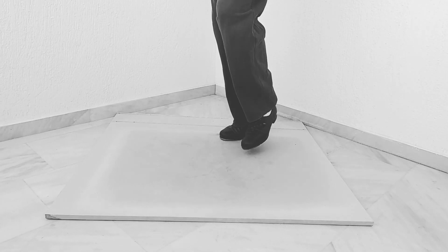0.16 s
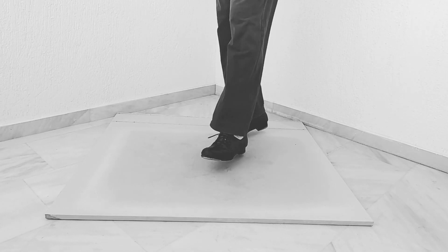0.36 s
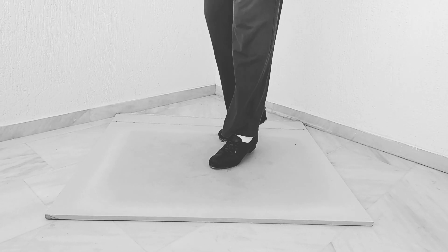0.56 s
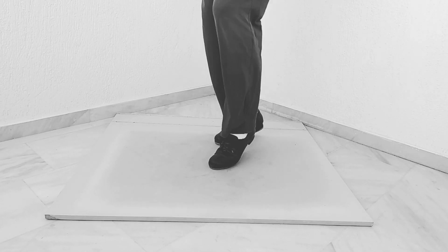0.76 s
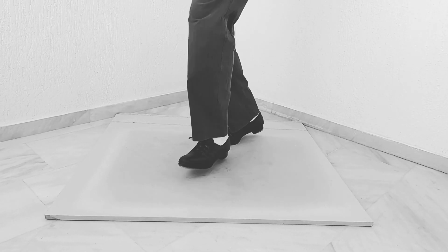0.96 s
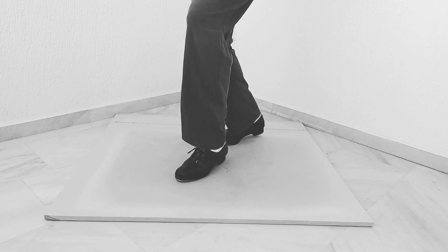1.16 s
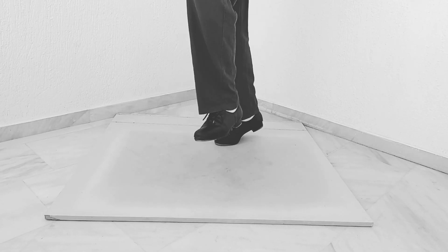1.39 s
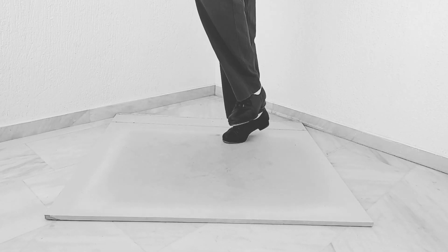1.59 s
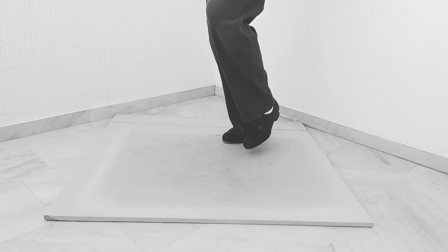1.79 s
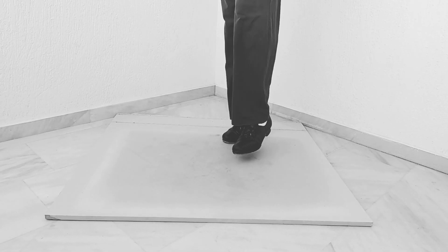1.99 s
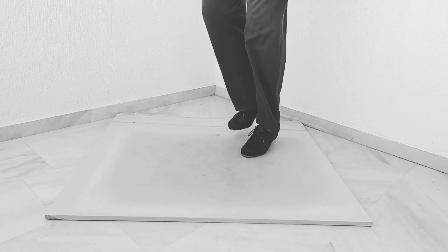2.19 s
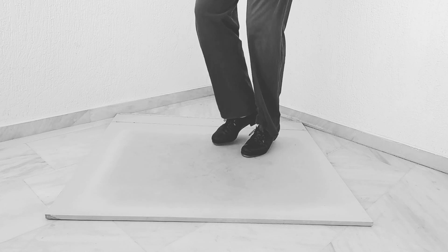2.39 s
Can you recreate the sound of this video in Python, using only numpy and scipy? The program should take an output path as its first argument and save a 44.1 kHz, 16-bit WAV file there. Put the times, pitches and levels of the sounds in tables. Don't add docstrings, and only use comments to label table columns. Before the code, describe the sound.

Tap shoes on a hard board: a few evenly spaced crisp clacks, a heavy double stomp, then three firm taps, close stereo microphone in a bare, echoing tiled room with faint hush.

```python
import sys
import numpy as np
from scipy import signal
from scipy.io import wavfile
from scipy.ndimage import uniform_filter1d, minimum_filter1d

SR = 44100
rng = np.random.default_rng(int(sys.argv[2]) if len(sys.argv) > 2 else 0)


def pcm_store(signal):
    levels = np.round(np.clip(np.atleast_2d(signal), -1, 1) * 32767)
    wavfile.write(sys.argv[1], SR, levels.astype(np.int16).T)


def how_loud(loudness_db):
    steps = np.asarray(loudness_db, float) / 20
    return 10 ** steps


N = 108045

# (pitch [Hz], level [dB per Hz])
HUSH_COLOUR = [(15, -3), (25, 3.5), (231, -10.5), (351, -15), (1520, -3.5), (2630, -17), (2850, -33.5),
               (7500, -24.5), (13000, -46)]
# (pitch [Hz], time to fall by 60 dB [s])
RING_TIMES = [(60, 0.52), (200, 0.7), (500, 0.64), (1200, 0.46), (3000, 0.47), (7000, 0.31), (11000, 0.4)]
# (pitch [Hz], likeness [0-1])
LIKENESS = [(60, 1), (300, 0.77), (700, 0.51), (1500, 0.067), (4000, 0.033), (12000, 0.1)]
# (delay [s], left level [dB], right level [dB])
WALL_ECHOES = [
    (.0036, 3, 4),
    (.0048, -4, -3),
    (.0075, -1, -1),
    (.0105, -2, -3),
    (.0145, 1, 1),
    (.018, 2, 1),
    (.021, 1, 1),
]
SLAB_BOOMS = [-66, -76, -42, -42, -45, -30, -29.5, -80, -78, -46, -44, -68, -80]
# (time [s], thud pitch [Hz], thud level [dB], crack pitch [Hz], crack level [dB])
STRIKES = [(-0.035, 254, -33, 2480, -27.5), (0.2367, 432, -36, 2800, -24), (0.4785, 318, -22, 3180, -31.5),
           (0.7392, 195, -23, 2417, -33), (0.7434, 180, -47, 2310, -25), (1.0308, 312, -11.5, 2480, -36),
           (1.0463, 223.5, -10, 3020, -31), (1.2667, 303, -96.5, 3560, -47),
           (1.4849, 300, -41.5, 3740, -58.5), (1.594, 700, -16, 2570, -26.5),
           (1.8799, 432, -43, 2920, -22.5), (2.1211, 203, -30, 2592, -24.5), (0.754, 300, -33, 2400, -68)]
# (low pitch [Hz], low level [dB], high pitch [Hz], high level [dB])
BOARD_KNOCKS = [(583, -17, 1310, -18), (918, -19.5, 1350, -13), (915, -24, 1270, -18.5),
                (997, -16.5, 1500, -28.5), (764, -19, 1420, -16), (964, -5.5, 1500, -9.5),
                (662, -14.5, 1050, -7.5), (800, -74, 1000, -73), (810, -41, 1600, -57),
                (528, -10, 1390, -13.5), (954, -19, 1290, -12), (700, -23, 1520, -14),
                (778, -25.5, 1400, -34.5)]
# (low pitch [Hz], low level [dB], high pitch [Hz], high level [dB])
PLATE_PINGS = [(4810, -27.5, 7060, -30.5), (5500, -22, 6910, -14.5), (5630, -21, 6970, -16),
               (5230, -21.5, 7160, -21), (5120, -24, 6400, -24), (5830, -20.5, 7600, -14.5),
               (6200, -16, 6560, -21), (7000, -52, 8150, -41.5), (5700, -47, 7300, -46.5),
               (4520, -27, 7620, -22.5), (5620, -19.5, 7260, -14.5), (5330, -19, 7080, -15.5),
               (5000, -37, 3100, -56)]
# (low pitch [Hz], low depth [0-1], high pitch [Hz], high depth [0-1])
CANCEL_DIPS = [(1960, 0.06, 5200, 0), (2190, 0.55, 4050, 0.28), (2010, .97, 4630, 1),
               (2130, 0.36, 4980, 0.9), (1970, 0.44, 4200, .7), (1960, 0.15, 3800, 0),
               (2000, 0, 4630, 0.93), (2000, 0.07, 3800, 0.64), (2000, .1, 4000, 0.25),
               (1060, 0.1, 8100, 0.45), (2100, .6, 4050, 0.5), (2070, 0.17, 3760, 0.4), (2100, 0, 4000, .1)]
MODE_WIDTHS = (0.32, 0.18, 0.68, 0.7, 0.15, 0.36)
MODE_SIGNS = (1, 1, 1, -1, 1, 1)
# (pitch [Hz], gain [dB])
MIC_COLOUR = [(40, 12), (300, 6), (2000, 8.5), (4000, 10), (8400, 5.5), (9000, 0.5), (11000, 4.5),
              (13000, -3.5)]
# (pitch [Hz], left minus right [dB])
SIDE_TILT = [(60, 4.0), (150, 7), (360, 2.5), (890, 3.5), (2190, 0.5), (5380, -2.0), (13200, -3)]

HUSH_DB = -62.5
RIGHT_LAG_S, RATTLE_S = 0.00013, 0.0027
FIRST_TOUCH, CONTACT_GAIN = 0.3, 1.3
ECHO_DULL_S, ECHO_TOP_HZ, SCATTER_S = 0.0079, 9700, 0.0005
ROOM_DB, ROOM_RISE_S = 5.5, 0.007
LATE_DB, LATE_STRETCH = -17, 1.7
BOOM_HZ, BOOM_T60_S, BOOM_LAG_S = 60.5, 0.099, 0.026
BLOW_LOW_HZ = 139
DIP_SHARPNESS = 5
LEAD = SR // 4
EDGE_HZ = 13700
PATCHY_HZ, PATCH_BINS, PATCH_FRAMES, PATCH_KEPT = 8800, 8, 6, 0.45
LIMIT_DB, RATIO, RECOVER_DB_PER_S, CEILING = -19.5, 3.2, 27.5, 0.97


def evened(x):
    return x / np.sqrt(np.mean(x ** 2) + 1e-20)


def read(points, hz):
    f, value = np.transpose(points)
    return np.interp(np.log(hz + 1), np.log(f + 1), value)


def causal(points, size=4096):
    log_gain = np.log(how_loud(read(points, abs(np.fft.fftfreq(size, 1 / SR)))))
    spectrum = np.exp(np.conj(signal.hilbert(log_gain)))
    return np.fft.ifft(spectrum).real[:size // 2]


def pair(shape, hz):
    a, b, c, d = rng.standard_normal((4,) + shape)
    same = np.clip(read(LIKENESS, hz), 0, 1)[:, None]
    left, other = a + 1j * b, c + 1j * d
    return np.array([left, same * left + np.sqrt(1 - same ** 2) * other])


def hush():
    frames, hz = N // 256 + 5, np.fft.rfftfreq(1024, 1 / SR)
    patches = uniform_filter1d(rng.standard_normal((513, frames)), 8, axis=0)
    patches = evened(uniform_filter1d(patches, 12, axis=1))
    level_db = read(HUSH_COLOUR, hz)[:, None] + 2.9 * patches
    z = pair(patches.shape, hz) * how_loud(level_db)
    noise = signal.istft(z, nperseg=1024, noverlap=768)[1][:, :N]
    return how_loud(HUSH_DB) * evened(noise)


def room_tail():
    hz, t = np.fft.rfftfreq(256, 1 / SR), np.arange(SR // 64 + 1) * 64 / SR
    t60 = read(RING_TIMES, hz)[:, None]
    early_power = how_loud(-120 * t / t60)
    late_power = how_loud(2 * LATE_DB - 120 * t / (t60 * LATE_STRETCH))
    fall = np.sqrt(early_power + late_power)
    tail = signal.istft(pair(fall.shape, hz) * fall, nperseg=256, noverlap=192)[1]
    tail *= 1 - np.exp(-(np.arange(tail.shape[1]) / SR / ROOM_RISE_S) ** 2)
    return tail * how_loud(ROOM_DB) / np.linalg.norm(tail[0])


def wall_echo(delay_s):
    echo = np.zeros((2, 128))
    spots = np.minimum(rng.random((2, 3)) * SCATTER_S * SR, 63).astype(int)
    np.put_along_axis(echo, spots, rng.choice([-1., 1.], (1, 3)) / np.sqrt(3), 1)
    top_hz = ECHO_TOP_HZ / (1 + (delay_s / ECHO_DULL_S) ** 2)
    r = np.exp(-2 * np.pi * top_hz / SR)
    return signal.lfilter([1 - r], [1, -r], echo)


def contact():
    x = np.zeros((2, 256))
    place, size, skew = rng.random((3, 6))
    at = (place * RATTLE_S * SR).astype(int)
    lag = np.round(2 * skew * RIGHT_LAG_S * SR).astype(int)
    for side in (0, 1):
        x[side, np.minimum(at + side * lag, 255)] = 2 * size - 1
    x[:, 0] = FIRST_TOUCH
    return CONTACT_GAIN * x / np.linalg.norm(x, axis=1, keepdims=True)


def room():
    path = room_tail()
    path[:, :256] += contact()
    for delay_s, *db in WALL_ECHOES:
        shift = rng.uniform(-0.9, 1)
        at = round(delay_s * SR * (1 + 0.08 * shift))
        path[:, at:at + 128] += how_loud(np.array(db))[:, None] * wall_echo(delay_s)
    return path


def boom(db):
    t = np.arange(SR // 2) / SR
    rise = 1 - np.exp(-(t / BOOM_LAG_S) ** 2)
    side_phase = np.array([[0], [0.15]])
    swing = np.sin(2 * np.pi * (BOOM_HZ * t + rng.random() + side_phase))
    return how_loud(db - 60 * t / BOOM_T60_S) * rise * swing


def ring(hz, db, width):
    t, damp = np.arange(4096) / SR, np.pi * hz * width
    envelope = 32 * damp ** 2 / SR * t * np.exp(-damp * t)
    return how_loud(db) * envelope * np.sin(2 * np.pi * hz * t)


def dip(x, hz, depth):
    band = signal.lfilter(*signal.iirpeak(hz, DIP_SHARPNESS, SR), x)
    return x - np.clip(depth, 0, 1) * band


def strike(modes, dips):
    hit = sum(sign * ring(hz, db, width)
              for (hz, db), width, sign in zip(modes, MODE_WIDTHS, MODE_SIGNS))
    hit = dip(dip(hit, *dips[:2]), *dips[2:])
    board = signal.butter(3, BLOW_LOW_HZ, "high", fs=SR, output="sos")
    return signal.sosfilt(board, hit)


def taps():
    out = np.zeros((2, N + LEAD + 2 * SR))
    parts = zip(STRIKES, BOARD_KNOCKS, PLATE_PINGS, SLAB_BOOMS, CANCEL_DIPS)
    for (s, thud_hz, thud_db, *crack), knock, ping, boom_db, dips in parts:
        modes = np.reshape([thud_hz, thud_db, *knock, *crack, *ping], (-1, 2))
        heard = signal.fftconvolve(strike(modes, dips)[None], room(), axes=1)
        low, at = boom(boom_db), LEAD + round(s * SR)
        out[:, at:at + heard.shape[1]] += heard
        out[:, at:at + low.shape[1]] += low
    return out[:, LEAD:LEAD + N]


def scene():
    return hush() + taps()


def microphone(x):
    ports = []
    for side in (1, -1):
        tilt = [(f, side * db / 2) for f, db in SIDE_TILT]
        ports.append(signal.oaconvolve(causal(MIC_COLOUR), causal(tilt))[:2048])
    x = signal.oaconvolve(x, np.array(ports), axes=1)[:, :N]
    return signal.oaconvolve(x, signal.firwin(255, EDGE_HZ, fs=SR)[None], "same", axes=1)


def gain_control(x):
    power = signal.lfilter([1 / 900], [1, 1 / 900 - 1], (x ** 2).mean(0))
    power_db = 10 * np.log10(abs(power) + 1e-12)
    fall = np.arange(N) * RECOVER_DB_PER_S / SR
    held_db = np.maximum.accumulate(power_db + fall) - fall
    over_db = np.maximum(held_db - LIMIT_DB, 0)
    return x / how_loud(-uniform_filter1d(over_db, 64) / max(RATIO, 1))


def patchy_top(x):
    hz, t, z = signal.stft(x, SR, nperseg=512)
    kept = rng.random((len(hz) // PATCH_BINS + 1, len(t) // PATCH_FRAMES + 1)) < PATCH_KEPT
    kept = np.kron(kept, np.ones((PATCH_BINS, PATCH_FRAMES)))[:len(hz), :len(t)]
    level = (abs(z) ** 2).sum((0, 1))
    attack = level > 2 * np.roll(level, 3)
    gain = np.where((hz[:, None] < PATCHY_HZ) | attack, 1, 0.85 * kept + 0.03)
    return signal.istft(z * gain, SR, nperseg=512)[1][:, :N]


def peak_limiter(x):
    room_left = np.minimum(CEILING / (abs(x).max(0) + 1e-9), 1)
    return x * uniform_filter1d(minimum_filter1d(room_left, size=129), size=65)


def roll_off(x):
    return signal.sosfilt(signal.butter(12, 13810, fs=SR, output="sos"), x)


def record(dry):
    x = gain_control(microphone(dry))
    mix = peak_limiter(patchy_top(x))
    return roll_off(mix)


dry = scene()
out = record(dry)
pcm_store(out)
```